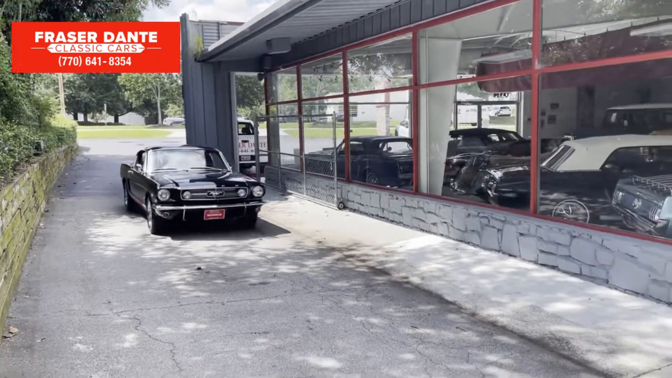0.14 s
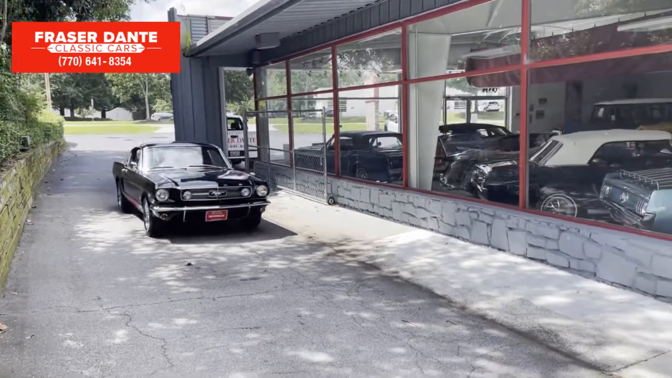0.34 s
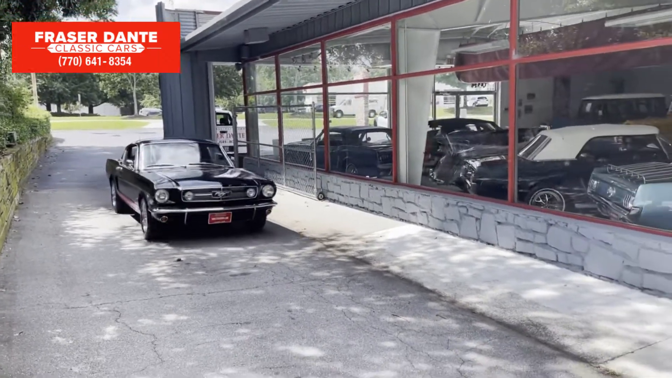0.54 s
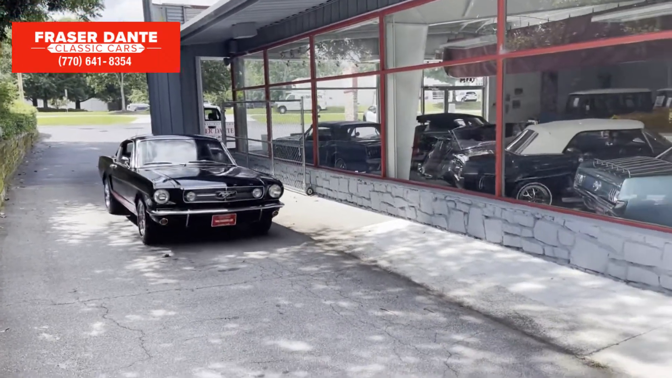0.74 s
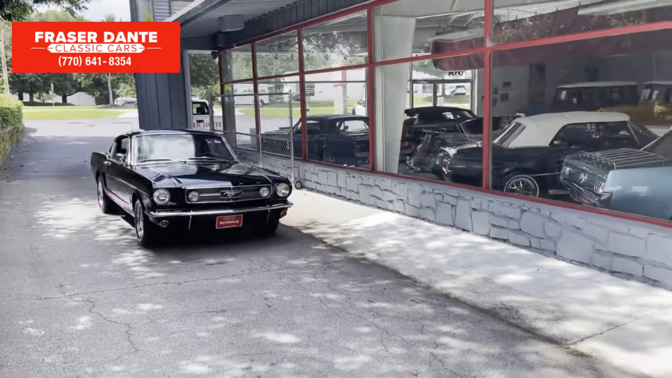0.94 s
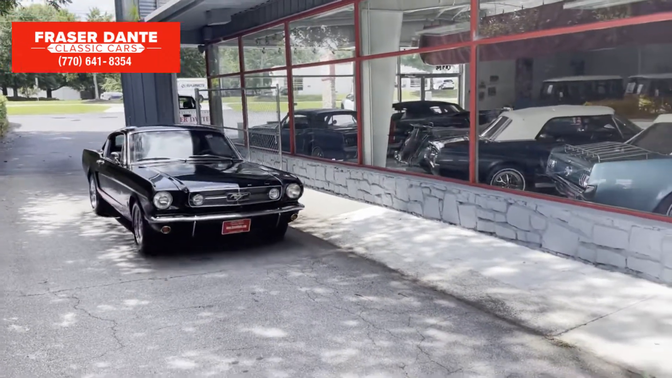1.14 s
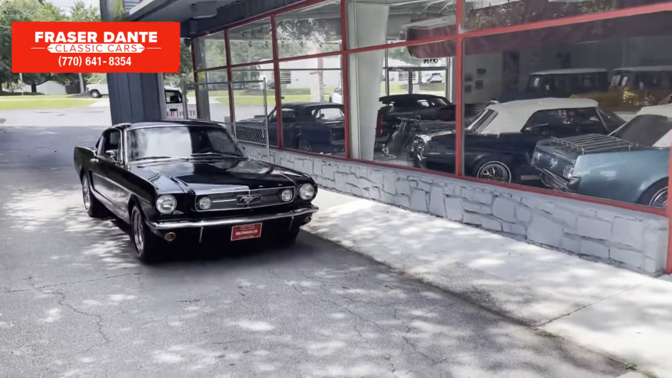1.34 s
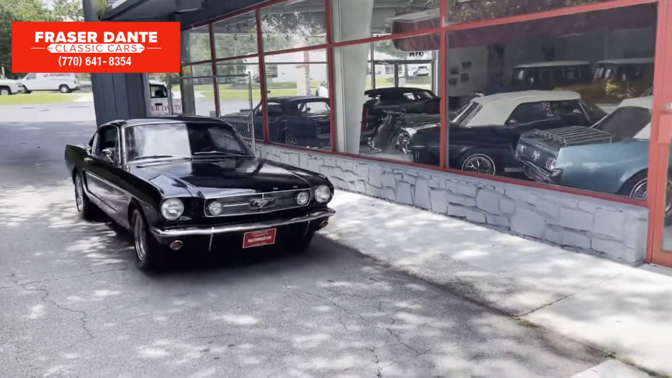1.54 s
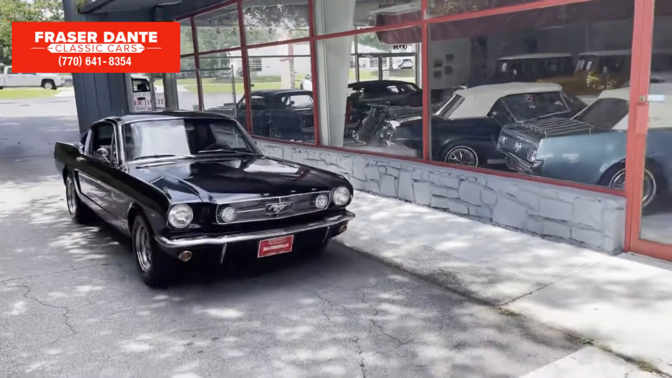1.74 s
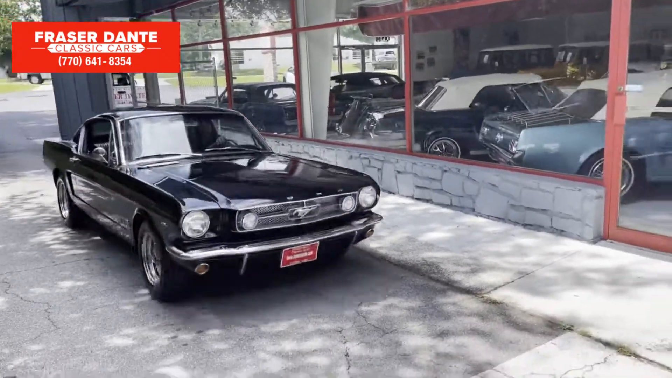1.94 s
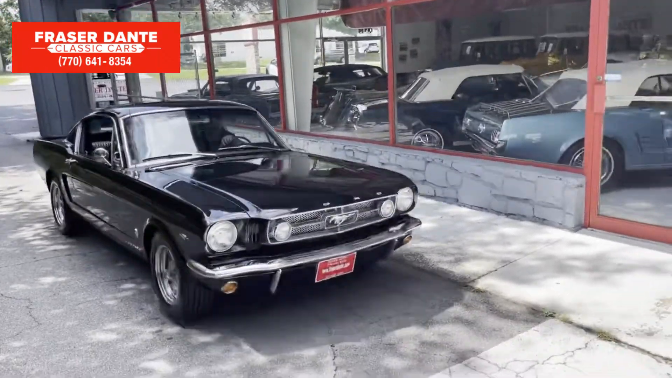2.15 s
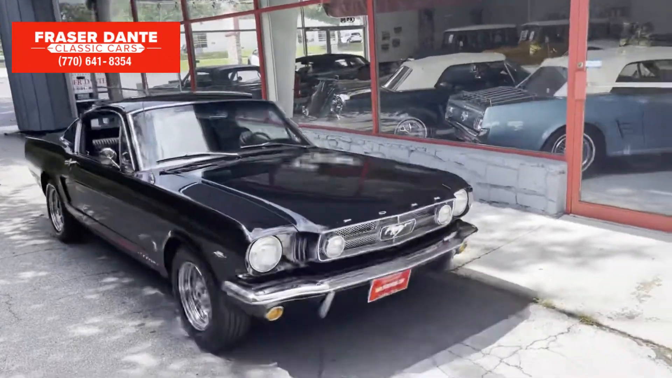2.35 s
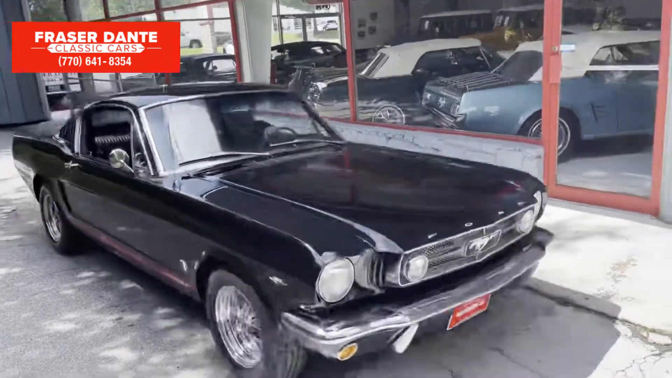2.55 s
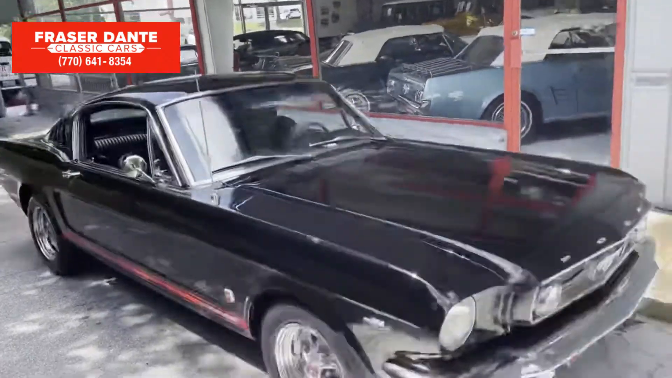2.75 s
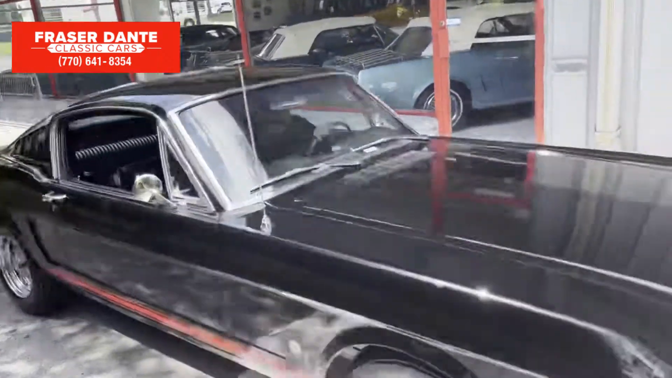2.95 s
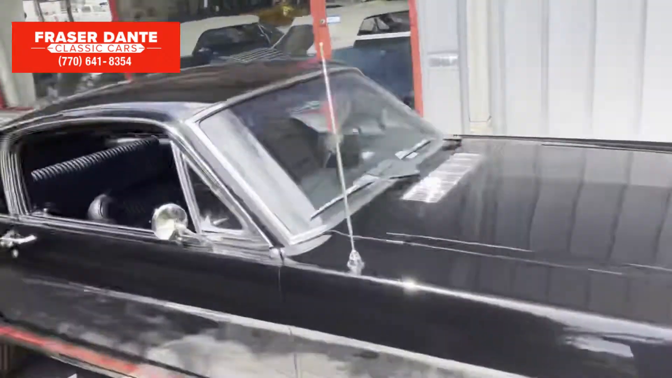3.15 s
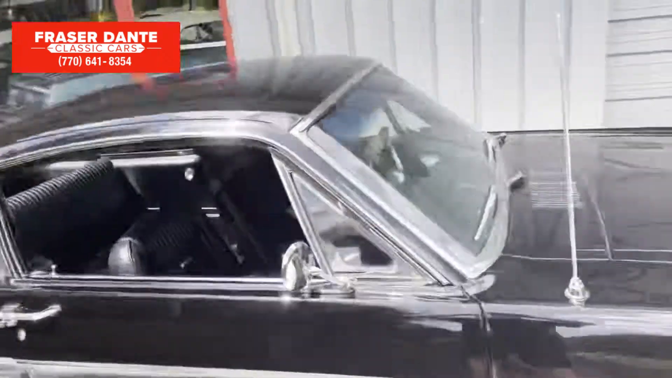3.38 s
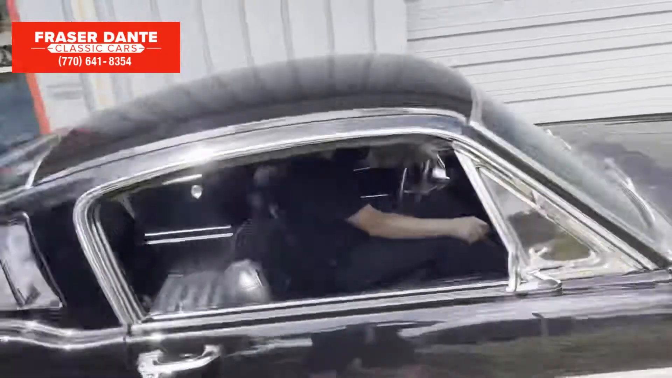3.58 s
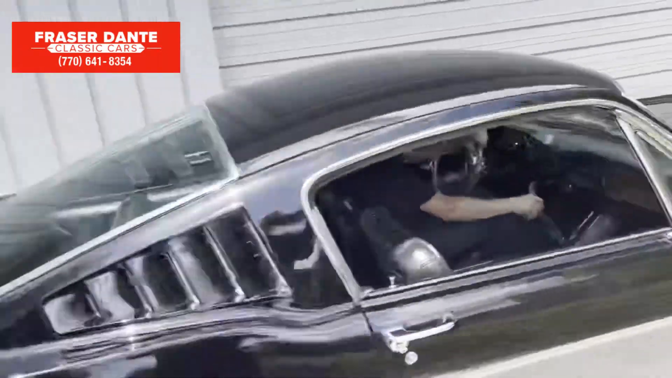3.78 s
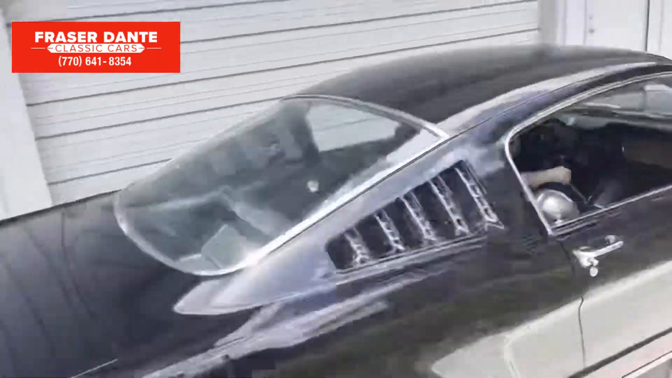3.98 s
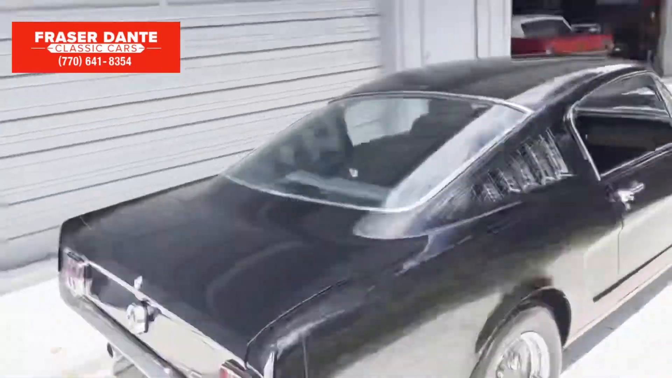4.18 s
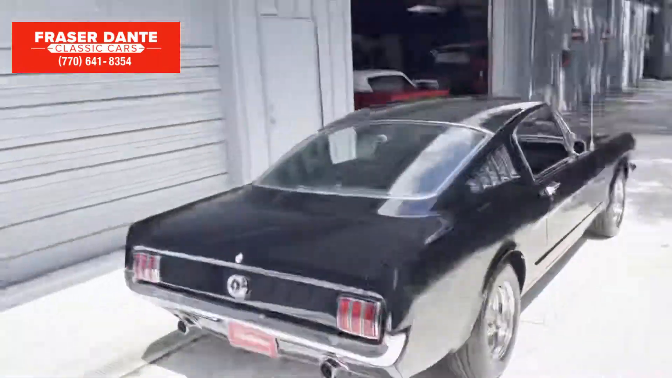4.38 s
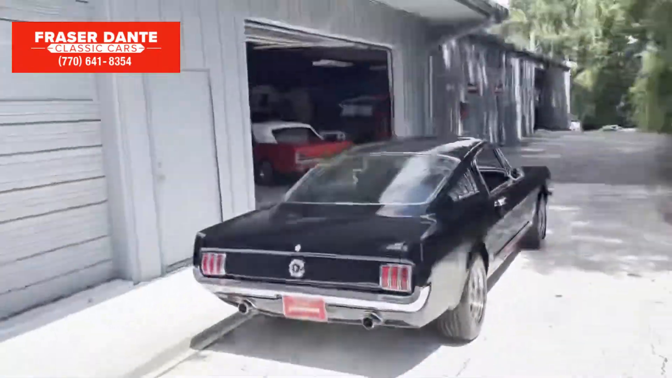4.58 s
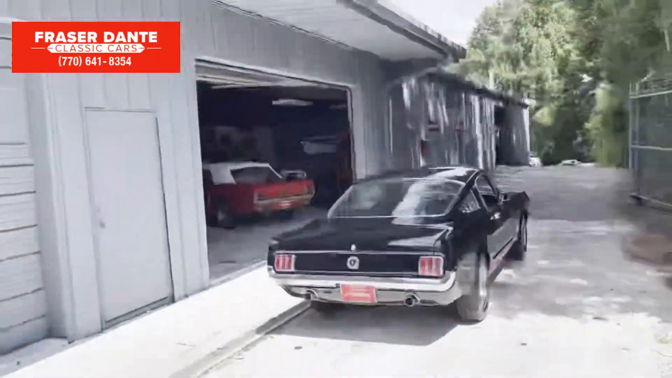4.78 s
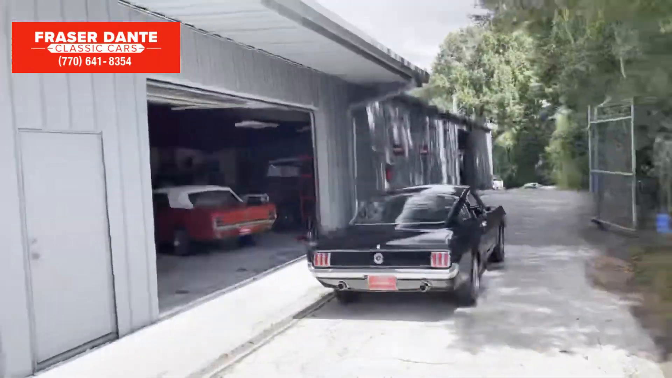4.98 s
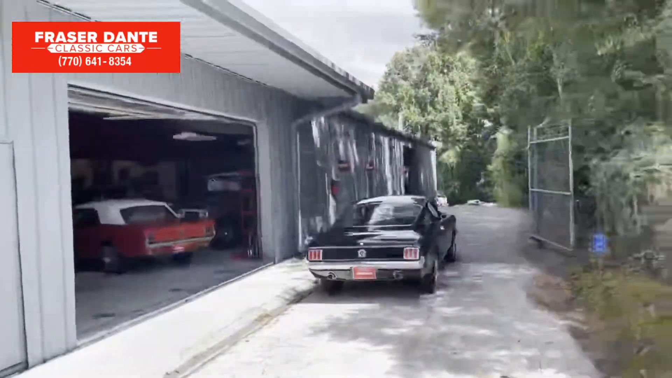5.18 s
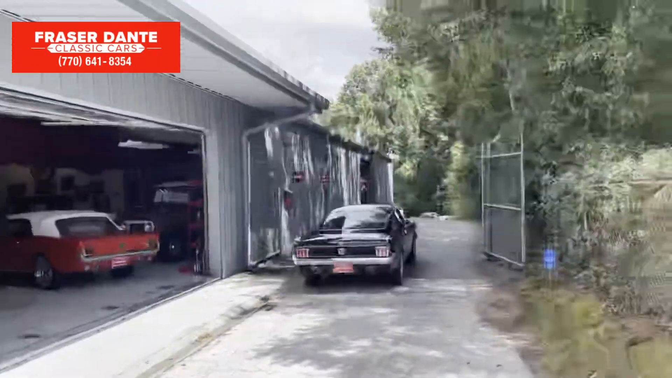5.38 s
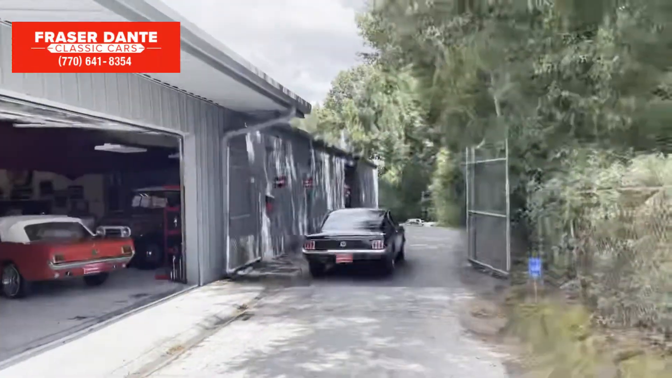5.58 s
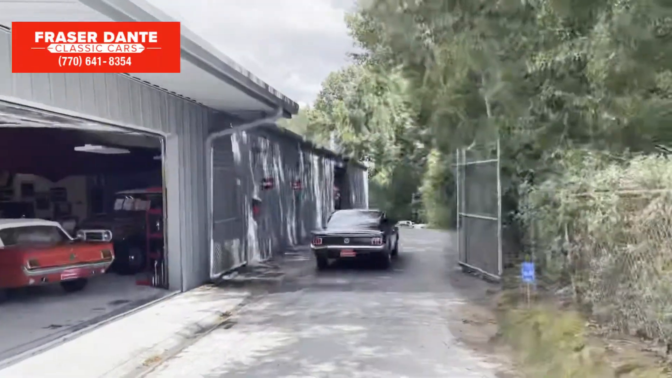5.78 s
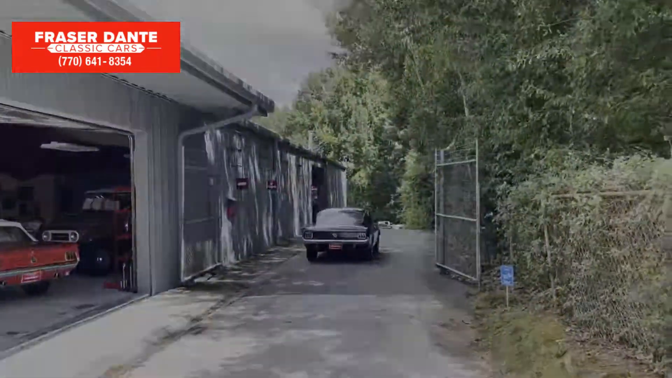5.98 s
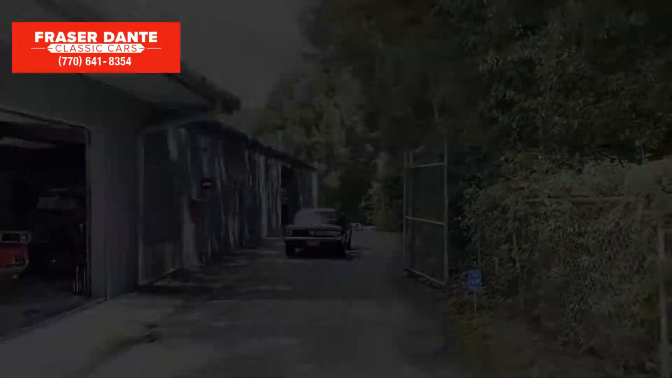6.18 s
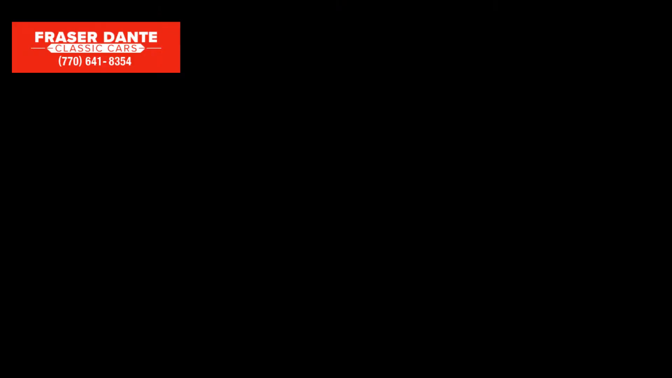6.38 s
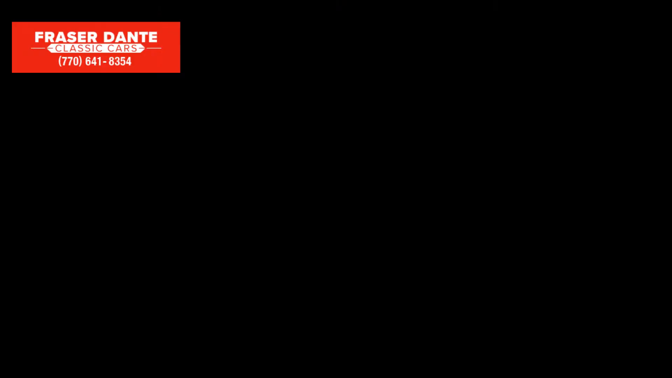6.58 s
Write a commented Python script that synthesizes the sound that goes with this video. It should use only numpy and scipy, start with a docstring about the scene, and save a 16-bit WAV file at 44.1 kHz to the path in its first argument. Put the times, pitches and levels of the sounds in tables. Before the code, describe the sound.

In a narrow lane beside a building, a V8 car approaches slowly with a deep, lumpy rumble and a faint tyre hiss. The sound swells as it passes right by the microphone, turning into a loud, rough exhaust growl with quick pops and small snaps of grit. The revs climb as it leaves, the throttle shuts, and one brief, softer bark follows as the engine recedes.

```python
"""V8 pass-by in a lane

A V8 car rolls towards the listener between a building and a hedge, passes close, pulls away and shifts
gear. Uneven firing gives low tones on multiples (orders) of the four-stroke cycle. Each exhaust puff
barks and rasps, with an echo off the asphalt; fan, intake and tyres hiss, and grit snaps."""
import sys
import numpy as np
from scipy import signal
from scipy.fft import rfft, irfft
from scipy.io import wavfile
from scipy.ndimage import uniform_filter1d

SR = 44100
rng = np.random.default_rng(int(sys.argv[2]) if len(sys.argv) > 2 else 0)


def store_wav(level_fs):
    """Save 16-bit WAV to argv[1]."""
    pcm = np.round(np.clip(np.atleast_2d(level_fs), -1, 1) * 32767)
    wavfile.write(sys.argv[1], SR, pcm.T.astype(np.int16))


N = 292221

# The strong engine orders, as multiples of the four-stroke cycle.
STRONG_ORDERS = 5, 8, 11, 13, 16, 17, 19, 21, 26, 32
# Colour of the exhaust pipe. Each row: frequency in Hz, gain in dB.
PIPE_COLOUR = [(25, -46), (55, 4), (90, -5.5), (130, 8), (185, -2.5), (225, -1.5), (262, 1), (305, -11.5),
               (400, -6.5), (600, -7.5), (2000, -19), (6000, -61.5)]


def from_db(db):
    return 10 ** (np.asarray(db) / 20)


def rms_one(x):
    return x / np.sqrt(np.mean(x ** 2) + 1e-20)


def in_time(rows):
    """One curve per column after the first, which holds seconds."""
    s, *columns = np.transpose(rows)
    return [np.interp(np.arange(N) / SR, s, c) for c in columns]


def at_hz(spectrum, hz):
    points_hz, db = np.transpose(spectrum)
    return np.interp(np.log(hz + 1), np.log(points_hz), db)


def drift(per_s):
    """A random wander, gliding between Gaussian values."""
    return np.interp(np.arange(N) / SR * per_s, np.arange(400), rng.standard_normal(400))


def delayed(x, seconds):
    return np.interp(np.arange(N) - seconds * SR, np.arange(N), x)


def decaying(x, seconds):
    """Gives each click an exponential tail."""
    return signal.lfilter([1], [1, -np.exp(-1 / (seconds * SR))], x)


def clicks(at, sizes):
    out = np.zeros(N)
    out[at] = sizes
    return out


def resonance(x, hz, width_hz):
    """Two-pole band-pass, unity gain at its peak."""
    r = np.exp(-np.pi * width_hz / SR)
    poles = [1, -2 * r * np.cos(2 * np.pi * hz / SR), r * r]
    return signal.lfilter([(1 - r * r) / 2, 0, (r * r - 1) / 2], poles, x + 1e-18)


def coloured(x, spectrum):
    """Minimum-phase EQ through points of Hz and dB."""
    cepstrum = irfft(np.log(from_db(at_hz(spectrum, np.linspace(0, SR / 2, 4097)))))
    cepstrum[1:4096] *= 2
    cepstrum[4097:] = 0
    return signal.fftconvolve(x, irfft(np.exp(rfft(cepstrum))))[:N]


def evened(x):
    """Steadies the level over about a tenth of a second, ready for an envelope."""
    return x / np.sqrt(uniform_filter1d(uniform_filter1d(x ** 2, size=5000), size=5000) + 1e-20)


def reflections(x, t60_s, patterns):
    """Diffuse echoes of the lane; their pattern keeps changing because the car moves."""
    out, hop = np.zeros(N + SR * 2), N // patterns + 1
    fade = from_db(-60 * np.arange(SR // 3) / SR / t60_s)
    padded = np.pad(x, (hop, 2 * hop))
    for start in range(0, N + hop, hop):
        piece = padded[start:start + 2 * hop] * np.hanning(2 * hop) ** .5
        tail = fade * rng.standard_normal(SR // 3) / np.sqrt(np.sum(fade ** 2))
        echo = signal.fftconvolve(piece, tail)
        out[start:start + len(echo)] += echo
    return out[hop:hop + N]


def with_ground_echo(x, share):
    """The tailpipes echo off the asphalt; the lag shrinks as the car leaves, so the comb climbs."""
    # Each row: time in seconds, lag in ms, relative strength 0-1.
    bounce = [(0, .6, .1), (2.5, 1.0, .1), (3.6, 1.6, .25), (3.95, 1.42, .8), (4.17, 1.27, .8),
              (4.35, 1.08, .7), (4.5, .94, .7), (4.85, .64, .8), (5.2, .46, .8), (6.63, .3, .4)]
    lag_ms, strength = in_time(bounce)
    return x + share * strength * delayed(x, lag_ms / 1000)


def hiss(level_db):
    """Fan, intake and tyres: bright noise with a slight flutter."""
    # Each row: frequency in Hz, gain in dB.
    colour = [(2500, 9), (5000, -3.5), (6800, -0.5), (8600, 5), (10200, 1), (11600, 7.5), (12500, -9),
              (13300, -47), (14500, -81)]
    noise = rms_one(coloured(rng.standard_normal(N), colour))
    return from_db(level_db + .99 * drift(24.23)) * noise


def whirr(hz=2340, width_hz=240):
    """A narrow band of noise from the engine bay swells as the bonnet goes by."""
    # Each row: time in seconds, level in dB.
    swell = [(0, -70), (2.5, -61), (2.85, -51), (3.1, -39), (3.4, -47), (3.52, -37), (3.58, -36.5),
             (3.85, -29.5), (4.05, -39), (4.4, -42), (6.63, -91)]
    band = resonance(resonance(rng.standard_normal(N), hz, width_hz), hz, width_hz)
    return from_db(in_time(swell)[0]) * rms_one(band)


def snaps():
    """Sharp exhaust cracks as the car passes, with grit ticks and a squeak: each a snap and a ring."""
    # Each row: start in seconds, level in dB, pitch in Hz, ring time in ms.
    hits = [(2.444, -41, 2200, 2), (0.483, -17, 9100, 0.99), (.4924, -30, 7000, 1.8),
            (1.6932, -24, 3150, 1.3), (1.911, -19.5, 9600, 1.4), (4.11, -27.5, 3150, 20),
            (4.1782, -18, 2267, 13), (4.1804, -24, 3160, 3.9), (4.32, -30, 6600, 1.8),
            (4.4717, -18, 3390, 2.4), (4.491, -18, 3150, 3.6), (4.5319, -18.5, 3270, 4.3),
            (4.888, -16, 4700, 1.7), (5.711, -37, 2210, 3.8), (5.7568, -38.5, 4180, 5.2),
            (5.808, -24, 3260, 1.2), (6.242, -42, 3350, 2), (6.335, -35, 3100, 3.9), (6.38, -42, 3550, 3),
            (6.405, -37, 3480, 3), (6.598, -42, 3700, 3)]
    out, t = np.zeros(N + 8000), np.arange(8000) / SR
    for s, db, hz, ring_ms in hits:
        snap = .22 * rng.standard_normal(len(t)) * np.exp(-t / .0072)
        ring = np.sin(2 * np.pi * hz * t) * np.exp(-t * 1000 / ring_ms)
        start = round(s * SR)
        out[start:start + len(t)] += from_db(db) * (snap + ring)
    return signal.sosfilt(signal.butter(3, [1800, 12000], "band", fs=SR, output="sos"), out[:N])


def rumble(throb_db, facing):
    """A bed of low noise in the colour of the pipe, riding on the throb."""
    noise = rms_one(coloured(rng.standard_normal(N), PIPE_COLOUR))
    return from_db(throb_db - 1.5 - 6 * facing) * noise


def order_tone(order, cycles):
    """A sine locked to a multiple of the engine cycle, at a random phase."""
    return np.sin(2 * np.pi * (order * cycles + rng.random()))


def growl(cycles):
    """Pulling away, single high orders swell, waver and fade; they stop when the throttle shuts."""
    # Each row: loudest moment in seconds, spread in seconds, level in dB.
    swells = [(4.36, 0.19, -25.5), (4.45, 0.2, -22), (4.72, 0.18, -28), (4.7, 0.15, -36), (4.92, 0.16, -26),
              (5.03, 0.1, -23), (5.2, 0.12, -28), (5.22, 0.104, -28)]
    # The multiple of the cycle that sings in each swell.
    orders = 35, 58, 25, 35, 37, 21, 25, 31
    out, t = np.zeros(N), np.arange(N) / SR
    for order, (s, spread, db) in zip(orders, swells):
        envelope = from_db(db + 2.5 * drift(25)) * np.exp(-((t - s) / spread) ** 2)
        out += envelope * order_tone(order, cycles)
    throttle = np.interp(t, [5.32, 5.345], [1, 0])
    return out * throttle


def silencer_booms(cycle_hz, throb_db):
    """The silencer booms in three bands, each shared by the strong orders in it; gives dB per order."""
    # Each row: centre in Hz, half width in Hz, change in the odd orders' weight in dB
    # once both tailpipes are heard alike from behind.
    bands = [(75.3, 27, -2), (134.3, 17.5, -17), (265, 24, 9)]
    # Weight of each strong order in dB.
    weights_db = -4, 5.5, 1, 4.5, 5.5, -18, -8, -14.5, -6, -10
    # Each row: time in seconds, level of the middle band in dB.
    main_boom = [(0, -27), (.05, -23), (.22, -63), (.31, -17), (.39, -25.5), (.46, -18), (.9, -31.5),
                 (.96, -37), (1.0, -21.5), (1.38, -15), (1.46, -26.5), (1.59, -30.5), (1.77, -13),
                 (2.25, -15), (2.31, -10), (2.62, -14), (2.79, -7), (2.88, -20), (3.05, -10.5), (3.19, -16),
                 (3.91, -7.5), (3.95, -22), (4.3, -13), (4.61, -9), (4.808, -22), (5.11, -20.5),
                 (5.32, -21.5), (5.345, -40), (5.385, -24), (5.48, -28), (5.59, -22), (5.76, -28),
                 (5.85, -17), (6.09, -33), (6.14, -47), (6.45, -29), (6.63, -38)]
    # Each row: time in seconds, level of the low band in dB, level of the upper band in dB.
    outer_booms = [(0, -28, -30), (.18, -35, -33.5), (.3, -33, -42.5), (.5, -27, -28.5), (.66, -25, -23.5),
                   (.9, -30, -43.5), (1.25, -42, -38), (1.66, -35, -62), (1.88, -28, -26.5),
                   (2.45, -27, -50), (2.71, -20.5, -51), (2.84, -30, -50), (2.92, -21, -31),
                   (3.06, -18, -18), (3.12, -14, -41), (3.41, -14, -25.5), (4.08, -17.5, -20.5),
                   (4.41, -32, -29.5), (4.93, -31.5, -20), (5.325, -35, -26), (5.35, -40, -34.5),
                   (5.68, -52, -51), (5.81, -49, -33), (6.07, -38, -46.5), (6.63, -63, -39.5)]
    tail_passes_s, turn_s, step = 4.8, .087, 64
    hz, t = np.outer(STRONG_ORDERS, cycle_hz[::step]), np.arange(0, N, step) / SR
    power = from_db(throb_db[::step] - 13 + at_hz(PIPE_COLOUR, hz)) ** 2  # floor between the booms
    behind = .5 + .5 * np.tanh((t - tail_passes_s) / turn_s)
    odd_behind = np.outer(np.mod(STRONG_ORDERS, 2), behind)
    low_db, upper_db = in_time(outer_booms)
    for (centre_hz, width_hz, odd_db), db in zip(bands, (low_db, in_time(main_boom)[0], upper_db)):
        weight = from_db(np.array(weights_db)[:, None] + odd_db * odd_behind) ** 2
        share = weight * np.exp(-((hz - centre_hz) / width_hz) ** 2) + 1e-30
        power += from_db(db[::step]) ** 2 * share / share.sum(axis=0)
    return [np.interp(np.arange(N) / SR, t, 10 * np.log10(p)) for p in power]


def throb(cycle_hz, cycles, throb_db, facing):
    """Low tones of the uneven firing: strong orders boom, weak ones take the pipe's colour and waver."""
    # Each row: multiple of the cycle, relative level in dB.
    weak_orders = [(3, -28), (4, -9.5), (6, -23), (7, -11), (9, -4), (10, -14), (12, -3.5), (14, -10.5),
                   (15, -10), (18, -2.5), (22, -2.5), (24, -5.5), (27, -1.5), (30, -1), (34, 0), (35, 0.5),
                   (40, 3), (43, 2), (48, 4.5)]
    out = np.zeros(N)
    for order, db in zip(STRONG_ORDERS, silencer_booms(cycle_hz, throb_db)):
        out += from_db(db) * np.sqrt(2) * order_tone(order, cycles)
    tilt_db_per_order = np.interp(facing, [0, 1], [-.2, -.08])
    for order, db in weak_orders:
        colour_db = at_hz(PIPE_COLOUR, order * cycle_hz) + order * tilt_db_per_order
        waver_db = 6.02 * drift(7 + .6 * order)  # higher orders waver faster
        out += from_db(throb_db - 4.5 + db + colour_db + waver_db) * order_tone(order, cycles)
    return out


def manifold_thuds(at, sizes, cylinder):
    """Every cylinder's puff takes its own path through manifold and silencer."""
    out = np.zeros(N)
    for k in range(8):
        path = rng.standard_normal(500) * np.exp(-np.arange(500) / (.003 * SR))
        path[0] = 7  # the direct pulse
        out += signal.oaconvolve(clicks(at, sizes * (cylinder == k)), rms_one(path))[:N]
    return out


def cracks(at, sizes, pitch_picks):
    """Each crack is a bare click and a spit of noise ringing at up to three of ten pitches."""
    noise = rng.standard_normal(N)
    breath = noise + np.sign(noise)
    rings = np.zeros(N)
    for k, hz in enumerate(np.geomspace(2100, 5500, 10)):
        spit = decaying(clicks(at, sizes * np.any(pitch_picks == k, axis=1)), seconds=.0024)
        rings += resonance(spit * breath, hz, width_hz=900)
    return evened(rings) + .12 * evened(clicks(at, sizes))


def puffs(cycles, facing):
    """Each firing sends a crack and a dying gust of gas down the pipe; gives bark and rasp drives."""
    # Each row, in firing order: bark accent in dB, rasp accent in dB, both at full facing.
    accents = [(2, 3), (1, -1), (-2, -1), (5, 5.5), (5, 2), (0, 2), (1, -1), (-4, -4)]
    loudest_cylinder, loudest_fires_s, jitter_s = 3, 4.78, .00014
    firing = np.floor(8 * (cycles - cycles[int(loudest_fires_s * SR)])).astype(int) + loudest_cylinder
    due = np.flatnonzero(np.diff(firing)) + 1
    cylinder = firing[due] % 8
    chance = rng.standard_normal((2000, 3))[:len(due)]
    pitch_picks = rng.integers(0, 10, (2000, 3))[:len(due)]
    at = np.clip(due + (jitter_s * SR * chance[:, 0]).astype(int), 0, N - 1)
    accent_db = np.array(accents)[cylinder].T * np.sqrt(facing[due])
    scatter_db = [[1.8], [1.2]] * chance[:, 1:].T
    bark_sizes, rasp_sizes = from_db(accent_db + scatter_db)
    gust = evened(decaying(clicks(at, bark_sizes), seconds=.007))
    turbulence = evened((1.2 - facing + gust) * rng.standard_normal(N))
    rings = cracks(at, rasp_sizes, pitch_picks)
    thuds = manifold_thuds(at, bark_sizes, cylinder)
    return [np.sqrt(share) * evened(attack) + np.sqrt(1 - share) * turbulence
            for attack, share in ((thuds, facing), (rings, facing ** 2))]


def tailpipes(drive, facing, away_colour, facing_colour, echo_share):
    """Puffs and their ground echo, crossfading between two colours as the tailpipes turn."""
    echoed = with_ground_echo(drive, echo_share)
    return evened((1 - facing) * coloured(echoed, away_colour) + facing * coloured(echoed, facing_colour))


def far_exhaust(drive):
    """Three bands of the exhaust carry from far down the lane."""
    # Each row: centre in Hz, filter width in Hz, relative level in dB.
    bands = [(380, 200, 5), (856, 72, 3), (3360, 880, -8)]
    # Each row: time in seconds, level in dB.
    swell = [(0, -78), (6.15, -51.5), (6.28, -48), (6.33, -40), (6.45, -38), (6.63, -45)]
    carried = sum(from_db(db) * rms_one(resonance(resonance(drive, hz, width), hz, 2 * width))
                  for hz, width, db in bands)
    return from_db(in_time(swell)[0]) * rms_one(carried)


def pops(rise_ms=1.5, roughness=.3):
    """The loudest single barks, each a quick rough ring of the tailpipe."""
    # Each row: start in seconds, level in dB, pitch in Hz.
    hits = [(2.443, -19, 835), (3.868, -9, 890), (3.942, -8, 894), (3.965, -7.5, 746), (3.99, -5.5, 697),
            (4.016, -2.5, 730), (4.089, -7, 800), (4.153, -4.5, 770), (4.178, -6, 525), (4.219, -11, 780),
            (4.249, -6, 560), (4.313, -8, 555), (4.375, -11, 560), (4.437, -5, 796), (4.492, -18, 580),
            (4.61, -8, 1140), (4.703, -8, 1150), (4.785, -11, 1040), (5.781, -24, 501), (6.307, -34, 850)]
    out, t = np.zeros(N + 2000), np.arange(2000) / SR
    age = t * 1000 / rise_ms
    envelope = age * np.exp(1 - age)
    for s, db, hz in hits:
        rough = roughness * rms_one(resonance(rng.standard_normal(len(t)), hz, width_hz=400))
        start = round(s * SR)
        out[start:start + len(t)] += from_db(db - 1) * envelope * (np.sin(2 * np.pi * hz * t) + rough)
    return out[:N]


def rasp(drive, bark_db, facing):
    """The bright edge of the puffs; it gains on the bark as the car pulls away under load."""
    # Tailpipes turned away, then facing. Each row: frequency in Hz, gain in dB.
    away_colour = [(900, -45), (1500, 14), (2000, 26.5), (2600, 15.5), (3300, 19), (4500, 17.5),
                   (5500, 23.5), (9000, -4), (14000, -72)]
    facing_colour = [(900, -56), (1500, 31), (2000, 26.5), (2600, 23.5), (3300, 21.5), (4500, 19),
                     (6000, 8.5), (9000, 2), (14000, -52)]
    # Each row: time in seconds, level against the bark in dB.
    balance = [(0, -19), (.6, -18.5), (1.1, -18), (1.58, -17), (1.7, -18), (2.0, -16), (2.8, -20.5),
               (3.6, -30), (3.9, -18), (4.3, -16), (4.75, -9.5), (5.0, -7.5), (5.25, -10), (5.29, -17),
               (5.33, -26), (5.36, -19), (5.8, -15), (6.3, -33), (6.63, -24)]
    edge = tailpipes(drive, facing, away_colour, facing_colour, echo_share=.58)
    return from_db(bark_db + in_time(balance)[0]) * edge


def bark(drive, bark_db, facing, dull_hz=814):
    """The midrange body of the puffs; off the throttle it loses its top first."""
    # Tailpipes turned away, then facing. Each row: frequency in Hz, gain in dB.
    away_colour = [(150, -48), (300, 2.5), (400, 4.5), (520, 0.5), (640, 3), (760, 8), (880, 7), (1000, 5),
                   (1400, 0), (2000, -17.5), (4000, -47), (9000, -57)]
    facing_colour = [(150, -49.5), (310, 11), (420, 11.5), (460, 6.5), (560, 9), (640, 7.5), (760, 13),
                     (940, 12), (1150, 11), (1430, 1.5), (2000, -24), (4000, -80), (9000, -103)]
    # Each row: time in seconds, low-passed share 0-1.
    dulling = [(0, 0.03), (5.25, 0.08), (5.285, 0.8), (5.72, .7), (5.79, 0.03), (5.87, 0.2), (5.95, 0.7),
               (6.25, .5), (6.32, 0), (6.63, 0)]
    body = from_db(bark_db) * tailpipes(drive, facing, away_colour, facing_colour, echo_share=.52)
    muffled = signal.sosfilt(signal.butter(4, dull_hz, fs=SR, output="sos"), body)
    dulled = in_time(dulling)[0]
    return (1 - dulled) * body + dulled * muffled


def scene():
    """The car nears, revs and leaves; the lane adds echoes and stereo width."""
    # Engine speed. Each row: time in seconds, four-stroke cycles per second (eight firings each).
    speed = [(0, 7.8), (.17, 7.1), (.36, 8.1), (.5, 9.9), (.61, 14.6), (.7, 13.9), (.8, 12.5), (.94, 10.0),
             (1.0, 7.8), (1.06, 7.8), (1.2, 8.75), (1.37, 8.4), (1.54, 7.4), (1.73, 7.5), (1.8, 8.2),
             (1.88, 9.05), (2.0, 9.4), (2.12, 9.0), (2.32, 7.85), (2.58, 7.25), (2.78, 7.85), (2.98, 9.9),
             (3.21, 11.4), (3.39, 10.0), (3.47, 10.4), (3.55, 11.6), (3.69, 11.65), (3.96, 13.65),
             (4.13, 14.05), (4.29, 15.9), (4.5, 16.55), (4.9, 18.9), (5.28, 20.6), (5.325, 20.6),
             (5.37, 18.3), (5.48, 15.8), (5.71, 13.3), (5.86, 16.2), (6.19, 11.1), (6.32, 12.2),
             (6.46, 16.0), (6.63, 14.7)]
    # Each row: time in seconds, bark level in dB, hiss level in dB.
    levels = [(0, -37.5, -44), (.3, -38.5, -45), (.45, -33, -38), (.51, -32, -36), (.57, -27, -33),
              (.68, -27.5, -36.5), (.73, -34.5, -36), (.82, -35, -39.5), (1.05, -36.5, -42),
              (1.4, -36, -40.5), (1.6, -38.5, -44), (1.68, -36, -40), (1.78, -32.5, -38), (1.9, -31, -37.5),
              (2.55, -34, -36), (2.9, -27, -30.5), (3.1, -25.5, -29.5), (3.4, -24.5, -30), (3.62, -22, -25),
              (3.98, -17, -26.5), (4.05, -17, -30.5), (4.2, -14.5, -29), (4.72, -19, -31.5),
              (4.93, -21.5, -36.5), (5.2, -24, -36), (5.27, -27.5, -43), (5.325, -29, -51),
              (5.345, -36.5, -51), (5.58, -46.5, -55.5), (5.72, -41, -59.5), (5.765, -42.5, -47),
              (5.795, -31, -47), (5.83, -32, -44), (5.875, -37, -49), (5.91, -39.5, -52), (6.16, -47, -63),
              (6.35, -43, -55.5), (6.63, -45, -59.5)]
    # Each row: time in seconds, how squarely the tailpipes face the listener 0-1.
    aim = [(0, .06), (2.6, .08), (3.5, .25), (3.9, .75), (4.4, .85), (4.8, .92), (5.28, .85), (5.4, .2),
           (6.2, .4), (6.35, .5), (6.63, .5)]
    # Stereo width. Each row: frequency in Hz, side gain in dB.
    width = [(60, -43), (200, -16), (380, -13), (700, -9), (1300, -5), (2400, -4.5), (4400, -5),
             (6500, -9.5), (9000, -35), (12000, -36), (15000, -18)]
    # EQ of the left channel. Each row: frequency in Hz, gain in dB.
    left_colour = [(200, 0.5), (700, 0.5), (1290, -1), (2380, 0), (4400, 1.5), (8120, -0.5)]
    flywheel_s, throb_hold_s, lane_db = .05, .008, -10
    cycle_hz = uniform_filter1d(in_time(speed)[0], size=int(flywheel_s * SR))
    cycles = np.cumsum(cycle_hz) / SR
    bark_db, hiss_db = in_time(levels)
    facing = in_time(aim)[0]
    # The throb follows the bark, just outlasts it, and recedes as the tailpipes face the listener.
    throb_db = np.maximum(bark_db, delayed(bark_db, throb_hold_s)) + 7 - 9 * facing
    bark_drive, rasp_drive = puffs(cycles, facing)
    exhaust = bark(bark_drive, bark_db, facing) + pops() + rasp(rasp_drive, bark_db, facing)
    exhaust += far_exhaust(bark_drive + rasp_drive)
    bed = rumble(throb_db, facing)
    bright = exhaust + hiss(hiss_db) + whirr() + snaps() + growl(cycles)
    mid = throb(cycle_hz, cycles, throb_db, facing) + bed + bright
    mid += from_db(lane_db) * reflections(bright, t60_s=.2, patterns=30)
    side = coloured(reflections(mid, t60_s=.023, patterns=90), width)  # wall one side, hedge the other
    return np.array([from_db(2.5) * coloured(mid + side, left_colour), from_db(1.74) * (mid - side)])


def record(dry):
    """The left microphone's port turns the treble's phase full circle; peaks round off, the top is cut."""
    port_hz, port_width_hz = 10180, 1900
    roll_off_hz, cutoff_hz = 13200, 15800
    r = np.exp(-np.pi * port_width_hz / SR)
    poles = [1, -2 * r * np.cos(2 * np.pi * port_hz / SR), r * r]
    left = signal.lfilter(poles[::-1], poles, dry[0])  # all-pass
    rounded = 1.055 * np.tanh(np.array([left, dry[1]]) / 1.426)
    softened = signal.sosfilt(signal.butter(4, roll_off_hz, fs=SR, output="sos"), rounded)
    return signal.sosfilt(signal.cheby2(12, 70, cutoff_hz, fs=SR, output="sos"), softened)


dry = scene()
out = record(dry)
store_wav(out)
```